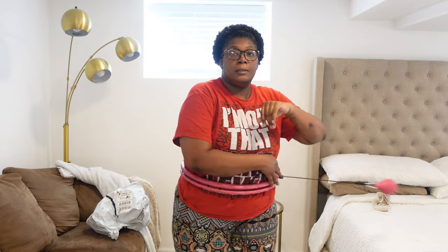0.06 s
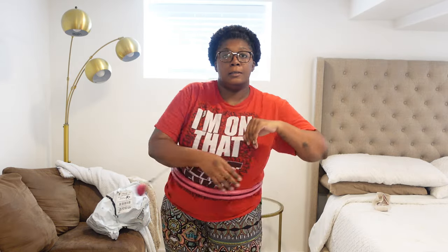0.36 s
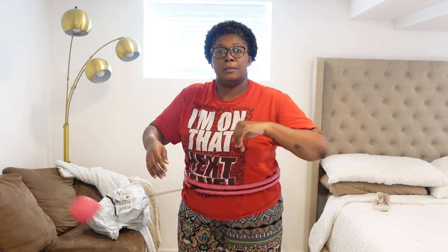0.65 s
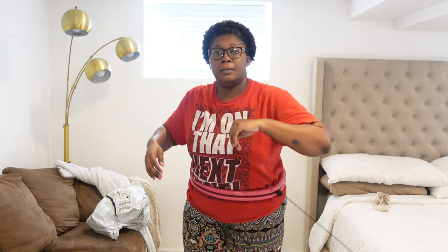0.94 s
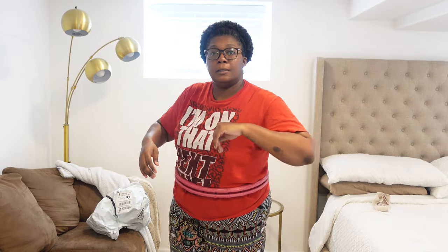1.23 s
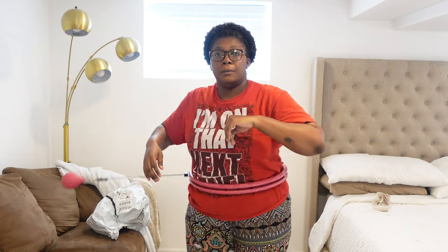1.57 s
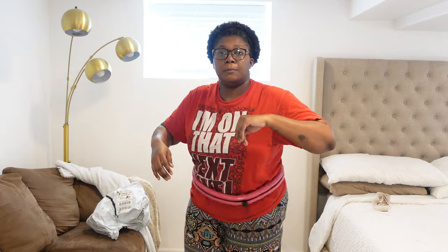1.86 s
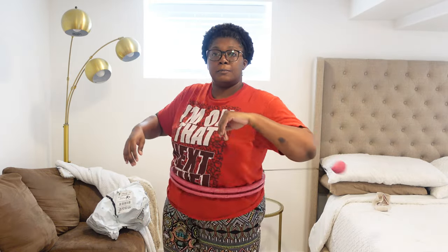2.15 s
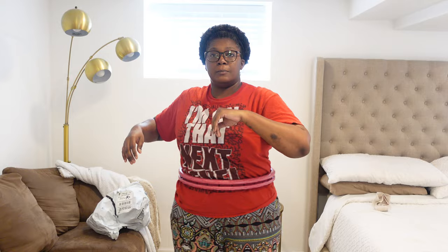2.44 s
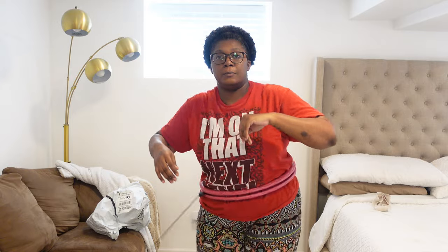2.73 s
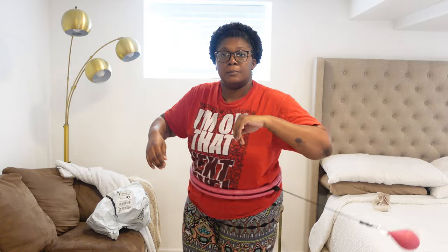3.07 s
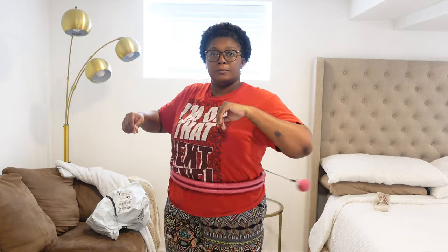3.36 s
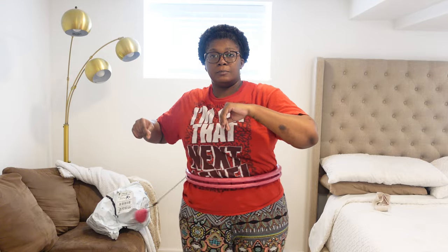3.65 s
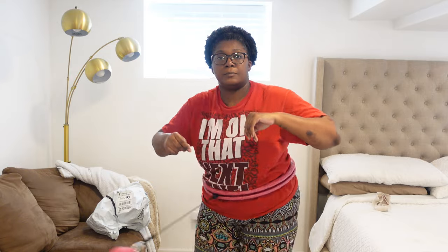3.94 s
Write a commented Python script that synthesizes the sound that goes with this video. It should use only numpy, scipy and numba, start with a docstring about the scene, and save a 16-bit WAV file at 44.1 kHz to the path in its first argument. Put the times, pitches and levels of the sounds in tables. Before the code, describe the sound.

A weighted hula hoop rattles and clacks as its weight circles the plastic track.

```python
"""A weighted hula hoop: a small wheeled carriage, pulled by a swinging weight, circles a plastic track
about once a second. Its wheels chatter in dense ticks and clack over the joints between hollow links;
the sound swells in front of the body and fades behind it. Loose parts ping, the carriage drags on the rim
and the wheels squeak faintly, in a bedroom with short echoes and quiet air."""
import sys
import numpy as np
from scipy import signal
from scipy.fft import rfft, irfft
from scipy.io import wavfile
from numba import njit

SR = 44100
rng = np.random.default_rng(int(sys.argv[2]) if len(sys.argv) > 2 else 0)


def persist_wave(psi):
    """Save psi, clipped to +-1, as 16-bit WAV."""
    counts = np.round(np.clip(psi, -1, 1) * 32767).astype(np.int16)
    wavfile.write(sys.argv[1], SR, np.atleast_2d(counts).T)


N = 176400


def undb(db):
    """Decibels to gain."""
    return 10 ** (np.asarray(db) / 20)


def unit_rms(x):
    """Scale to rms 1."""
    return x / np.sqrt(np.mean(x ** 2))


def unit_energy(x):
    """Scale to energy 1."""
    return x / np.sqrt(np.sum(x ** 2))


def add(out, start_s, sound):
    """Mix a sound in at its start time."""
    at = max(int(start_s * SR), 0)
    out[at:at + len(sound)] += sound[:max(N - at, 0)]


def wander(per_s):
    """Gaussian random values joined by lines."""
    return np.interp(np.arange(N) / SR * per_s, np.arange(2048), rng.standard_normal(2048))


def colour(x, points, size=4096):
    """Minimum-phase filter through (Hz, dB) points."""
    hz, db = np.array(points, float).T
    bin_hz = np.maximum(np.fft.rfftfreq(size, 1 / SR), 1)
    gain = undb(np.interp(np.log(bin_hz), np.log(hz), db))
    cepstrum = irfft(np.log(gain))
    cepstrum[1:size // 2] *= 2
    cepstrum[size // 2 + 1:] = 0
    return signal.fftconvolve(x, irfft(np.exp(rfft(cepstrum))))[:len(x)]


@njit
def bandpass(x, hz, width_hz):
    """State-variable band-pass, one centre per sample, peak gain 1."""
    y, band_state, low_state = np.empty(len(x)), 0., 0.
    for i in range(len(x)):
        g, damping = np.tan(np.pi * hz[i] / SR), width_hz / hz[i]
        band = (band_state + g * (x[i] + 1e-18 - low_state)) / (1 + g * (g + damping))
        band_state = 2 * band - band_state
        low_state += 2 * g * band
        y[i] = damping * band
    return y


def resonate(x, hz, width_hz):
    """Resonance at a fixed or moving pitch."""
    return bandpass(x, hz * np.ones(len(x)), float(width_hz))


# Room air spectrum. Each row: frequency in Hz, relative density in dB.
AIR_SPECTRUM = [(30,-33),(65,-18),(160,-0.5),(210,3.5),(300,-0.5),(480,-1),(800,-15),(3000,3.5),(15000,-32)]


def air(level_db=-54.5, side_db=-3.5):
    """Faint steady rush of the room."""
    mid, side = (unit_rms(colour(rng.standard_normal(N), AIR_SPECTRUM)) for _ in range(2))
    return undb(level_db) * (mid + undb(side_db) * side * np.array([[1], [-1]]))


# Stereo width of the echoes. Each row: frequency in Hz, relative side gain in dB.
ECHO_WIDTH = [(100,13),(1500,0.5),(7000,6.5),(14000,4)]


def bedroom(x, early_db=-10, early_s=.0069, late_db=-11.5, t60_s=.24, side_db=-9.5, renew_s=.1):
    """Near walls and a short tail; the echo pattern keeps changing as the carriage moves."""
    lag, t = np.arange(SR // 3) / SR, np.arange(N) / SR
    early = undb(early_db) * unit_rms(np.exp(-lag / early_s) * (1 - np.exp(-lag / .0008)))
    late = undb(late_db) * unit_rms(np.exp(-np.log(1000) * lag / t60_s) * (1 - np.exp(-lag / .0065)))
    envelope = np.hypot(early, late) / np.sqrt(len(lag))
    wet = np.zeros((2, N + len(lag)))  # mid, side
    for centre_s in np.arange(0, t[-1] + renew_s, renew_s):
        share = 1 - np.abs(t - centre_s) / renew_s
        near = np.flatnonzero(share > 0)
        if len(near):
            segment = x[near] * np.sqrt(share[near])
            echo = signal.fftconvolve(segment[None], envelope * rng.standard_normal((2, len(lag))))
            wet[:, near[0]:near[0] + echo.shape[1]] += echo
    mid = x + wet[0, :N]
    side = undb(side_db) * colour(wet[1, :N], ECHO_WIDTH)
    return np.array([mid + side, mid - side])


def chatter(ticks_per_s=4500, spread_db=2, max_spreads=2.96, friction_db=-5.5):
    """Dense ticks of the bouncing wheels over smooth friction."""
    ticks = (rng.random(N) < ticks_per_s / SR) * np.sign(rng.standard_normal(N))
    size_db = spread_db * np.minimum(rng.exponential(size=N), max_spreads)
    return unit_rms(ticks * undb(size_db)) + undb(friction_db) * rng.standard_normal(N)


def bounces(per_s=7000, rise_s=.0005, decay_s=.0065, drop_gain=7.7, size=4096):
    """A few milliseconds of rattle, and the harder first drop that starts it."""
    t = np.arange(size) / SR
    envelope = (1 - np.exp(-t / rise_s)) * np.exp(-t / decay_s)
    ticks = (rng.random(size) < per_s / SR) * np.sign(rng.standard_normal(size))
    return ticks * envelope, drop_gain * (t == 0)


# Track response, carriage in front of and behind the body. Each row: frequency in Hz, gain in dB.
TRACK_FRONT = [(35,-73),(400,-35),(580,-23),(730,-24.5),(1020,-13),(1230,-13.5),(1550,-6),(1950,-4.5),(2330,3),(2600,1),(2950,1.5),(4150,-6.5),(4900,-12.5),(5750,-12.5),(9300,-26.5),(10500,-21.5),(12600,-32.5),(15000,-32),(16000,-46)]
TRACK_BEHIND = [(35,-54.5),(430,-30),(580,-17.5),(760,-24),(1000,-12.5),(1250,-15.5),(2000,-6),(2300,0),(2550,-3.5),(2850,0.5),(3700,-7),(5000,-9),(5750,-7.5),(7700,-10.5),(9200,-17.5),(10300,-15.5),(12500,-24),(15000,-28),(16000,-78)]


def track_bands(x, behind, edges_hz=(1372, 4860)):
    """Vibration coloured by the plastic track, split into bass, middle and treble."""
    x = colour(x, TRACK_BEHIND if behind else TRACK_FRONT)
    hz, spectrum = np.fft.rfftfreq(len(x), 1 / SR), rfft(x)
    bass, below_treble = (irfft(spectrum / (1 + (hz / edge) ** 8), len(x)) for edge in edges_hz)
    return bass, below_treble - bass, x - below_treble


LINKS_PER_S, LINK_WIDTH_HZ = 20, 110


def wheel_squeak(hz=10300, width_hz=380, level_db=-66, swing_db=5.2):
    """Faint high squeak that comes and goes from link to link."""
    squeak = resonate(resonate(chatter(), hz, width_hz), hz, width_hz)
    return undb(level_db + swing_db * wander(LINKS_PER_S)) * unit_rms(squeak)


# Rim drags. Each row: start and end in seconds, first and last pitch in Hz, level in dB.
RIM_DRAGS = [(0.359,0.484,3180,2000,-22.5),(2.75,2.801,3420,4000,-27),(3.679,3.927,2380,1470,-36)]


def rim_drags():
    """The carriage drags along the rim: a gliding resonance that swells and fades."""
    out = np.zeros(N)
    for start_s, end_s, from_hz, to_hz, db in RIM_DRAGS:
        progress = np.linspace(0, 1, int((end_s - start_s) * SR))
        glide_hz = from_hz + (to_hz - from_hz) * progress
        scrape = resonate(chatter()[:len(progress)], glide_hz, width_hz=146)
        swell = np.sqrt(np.abs(np.sin(np.pi * progress)))
        add(out, start_s, undb(db) * swell * unit_rms(scrape))
    return out


# Loose-part pings. Each row: start in seconds, relative level in dB, ring in Hz.
PART_PINGS = [(0.654,-15,4320),(.769,-11.5,4100),(.821,-14,4080),(0.871,-10,5300),(2.394,-17,2980),(2.459,-21.5,2720),(2.498,-16.5,2740),(3.522,-17.5,3030)]


def part_pings(ring_db=10, tick_db=-5.5):
    """Small loose parts of the carriage tick and ring briefly."""
    out = np.zeros(N)
    for start_s, db, hz in PART_PINGS:
        rattle, drop = bounces()
        _, _, tick = track_bands(rattle, behind=True)
        ring = resonate(rattle + drop, hz, width_hz=100)
        ping = undb(ring_db) * unit_energy(ring) + undb(tick_db) * unit_energy(tick)
        add(out, start_s, undb(db) * ping)
    return out


# Joint strikes. Each row: start in seconds, relative level in dB, link ring in Hz, knock offset in dB.
JOINT_STRIKES = [(.014,-8,2410,-6),(.043,-7.5,2440,-3),(.053,-16,2950,-6),(.091,-14.5,2920,1),(.1,-8,2600,1.5),
                 (.391,-17,2620,0),(.436,-5,2400,-20),(.571,-7,2600,2.5),(.605,-7,2400,3),
                 (.839,-11.5,2300,-1),(.87,-12,2340,-10),(.883,-3,2300,-10),(.921,-7,2300,-7),(.957,-8.5,2340,-5),
                 (1.077,-13.5,2480,2),(1.139,-10,2990,-2),(1.315,-15,2790,4),(1.402,-21.5,2560,7),
                 (1.663,-16,3100,-16),(1.693,-8,2710,-4),(1.733,-11,3310,-5),(1.744,-13,2390,5.5),(1.777,-11.5,2420,5),
                 (1.86,-6,2200,-2),(1.934,-9.5,2450,-26),(2.039,-13.5,2340,5),(2.607,-18,2570,5),
                 (2.731,-14,3410,6),(2.761,-11.5,3360,-7),(2.788,-12.5,2450,-5),(2.83,-15,2360,8),(2.867,-9,2590,-2),(2.902,-6,2550,-3),(2.938,-2.5,2400,-8),
                 (2.982,-10.5,2410,3),(3.027,-9,2500,-6),(3.052,-7.5,2690,-17),(3.07,-9.5,2440,-5),(3.191,-17.5,2440,-1),
                 (3.895,-10.5,2910,-4),(3.974,-10.5,3070,3.5)]


def joint_clacks(middle_db=6.5, ring_db=11.5, treble_db=-2.5, knock_db=6, knock_top_hz=1730):
    """A wheel drops into a joint and rattles, ringing that link and knocking the body of the track."""
    out = np.zeros(N)
    lowpass = signal.butter(4, knock_top_hz, fs=SR, output="sos")
    for start_s, db, link_hz, knock_offset_db in JOINT_STRIKES:
        rattle, drop = bounces()
        bass, middle, treble = track_bands(rattle, behind=False)
        ring = resonate(rattle + drop, link_hz, LINK_WIDTH_HZ)
        knock = signal.sosfilt(lowpass, bass + middle)
        clack = (undb(middle_db) * unit_energy(middle)
                 + undb(ring_db) * unit_energy(ring)
                 + undb(treble_db) * unit_energy(treble)
                 + undb(knock_db + knock_offset_db) * unit_energy(knock))
        add(out, start_s, undb(db) * clack)
    return out


def link_ring(decay_s=.12):
    """Chatter rings the link last entered, dying away after each joint."""
    t = np.arange(N) / SR
    joint_s, _, link_hz, _ = np.array(JOINT_STRIKES).T
    last = np.maximum(np.searchsorted(joint_s, t) - 1, 0)
    envelope = np.exp(-np.abs(t - joint_s[last]) / decay_s)
    return unit_rms(resonate(envelope * chatter(), link_hz[last], LINK_WIDTH_HZ))


def wheel_grip(dip_db=-1.5, half_gap_s=.014):
    """Gain dip just before each strike: the wheels lose grip across the gap of the joint."""
    t = np.arange(N) / SR
    over_gap = sum(np.maximum(1 - np.abs((t - start_s) / half_gap_s + 1) ** 4, 0)
                   for start_s, *_ in JOINT_STRIKES)
    return undb(dip_db * over_gap)


def wheel_skips(per_s=130, depth=.91, decay_s=.002):
    """Sharp, brief gain surges where a wheel skips."""
    skips = (rng.random(N) < per_s / SR) * 1.
    surges = signal.lfilter([1], [1, -np.exp(-1 / (decay_s * SR))], skips)
    return 1 + depth * np.minimum(surges, 1)


# Carriage right behind the body. Each entry: time in seconds.
BEHIND_BODY_S = [-.6, .22, 1.47, 2.4, 3.45, 4.45]
# Rolling contour. Each row: time in seconds, level in dB, treble offset in dB.
ROLL_CONTOUR = [(0,-23,-3),(.08,-27,-5.5),(.14,-25,-1.5),(.22,-28.5,0.5),(.32,-28,2),(.39,-19,1.5),(.44,-23,7.5),(.48,-24.5,-2),(.55,-28.5,4.5),(.6,-25,-2),(.66,-29,-1),(.85,-29,2.5),(.91,-25.5,-0.5),(1.08,-27,0.5),(1.17,-25.5,2.5),(1.31,-27.5,-0.5),(1.38,-32,-2.5),(1.45,-38.5,-2.5),(1.49,-35.5,-2),(1.535,-41,-4),(1.61,-30.5,-0.5),(1.72,-25.5,0.5),(1.86,-24,2),(2.02,-24,2),(2.17,-35.5,0.5),(2.25,-35,-1.5),(2.31,-37.5,-6.5),(2.35,-41,-5),(2.44,-38.5,-6),(2.56,-36.5,2),(2.68,-28,3),(2.77,-24.5,3.5),(3.05,-26.5,-1),(3.17,-29.5,2.5),(3.3,-36.5,.5),(3.41,-42.5,-1),(3.495,-36.5,-2.5),(3.67,-30.5,2.5),(3.85,-29,4.5),(3.9,-26.5,7),(4,-25.5,-4.5)]


def rolling(bass_db=-16, treble_db=-9.5, ring_db=-5, link_spread_db=1,
            wobble_hz=201.4, wobble_db=1.5, flicker_hz=108.3, flicker_db=1.9):
    """Wheels bounce unevenly over links of differing loudness; the body shades the far side of a turn."""
    t = np.arange(N) / SR
    load = undb(wobble_db * wander(wobble_hz) + link_spread_db * wander(LINKS_PER_S))
    half_angle = np.pi * np.interp(t, BEHIND_BODY_S, np.arange(len(BEHIND_BODY_S)))
    front_gain, back_gain = np.sin(half_angle), np.cos(half_angle)
    front = track_bands(load * chatter(), behind=False)
    back = track_bands(load * chatter(), behind=True)
    bass, middle, treble = (front_gain * unit_rms(front_band) + back_gain * unit_rms(back_band)
                            for front_band, back_band in zip(front, back))
    time_s, level_db, treble_offset_db = np.array(ROLL_CONTOUR).T
    middle = unit_rms(middle + undb(ring_db) * front_gain * link_ring())
    treble = unit_rms(treble * wheel_skips()) * undb(treble_db + np.interp(t, time_s, treble_offset_db))
    bass = bass * undb(bass_db + flicker_db * wander(flicker_hz))
    return undb(np.interp(t, time_s, level_db)) * (wheel_grip() * (middle + bass) + treble)


def scene():
    """The hoop in the bedroom."""
    hoop = rolling() + joint_clacks() + part_pings() + rim_drags() + wheel_squeak()
    return bedroom(hoop) + air()


def record(dry):
    """Steep low-pass on the top treble."""
    top_hz = 15900
    return signal.sosfilt(signal.ellip(10, .2, 80, top_hz, fs=SR, output="sos"), dry)


dry = scene()
out = record(dry)
persist_wave(out)
```